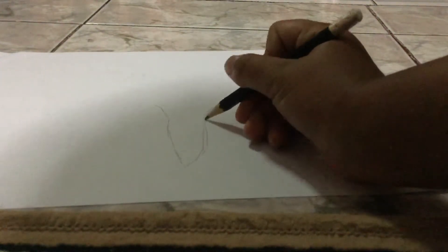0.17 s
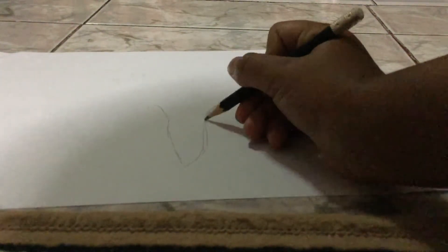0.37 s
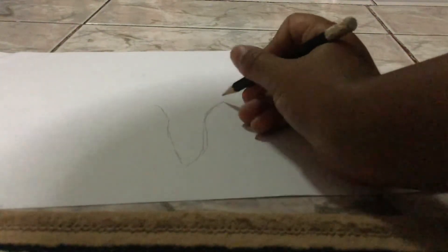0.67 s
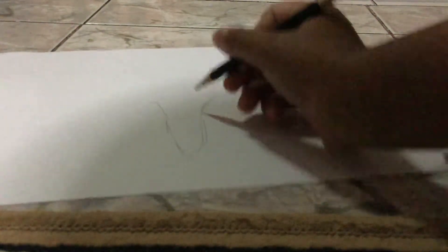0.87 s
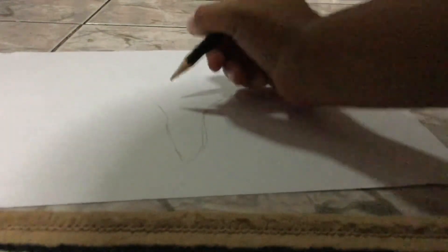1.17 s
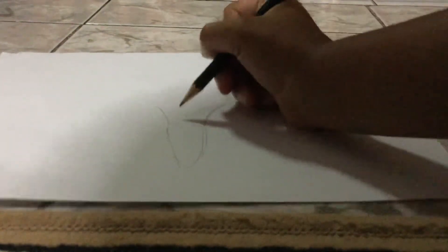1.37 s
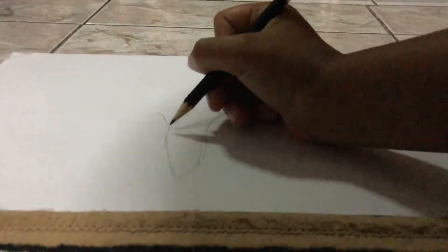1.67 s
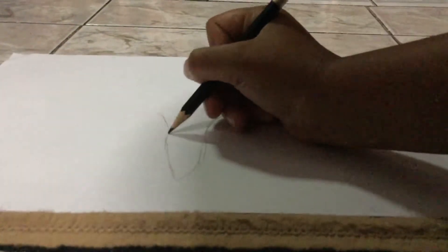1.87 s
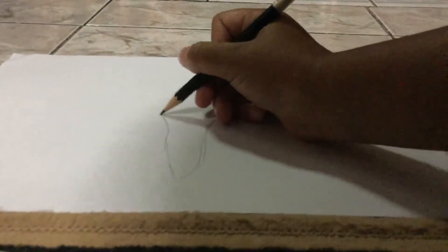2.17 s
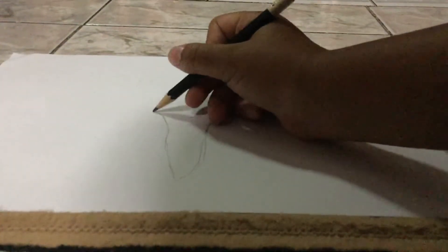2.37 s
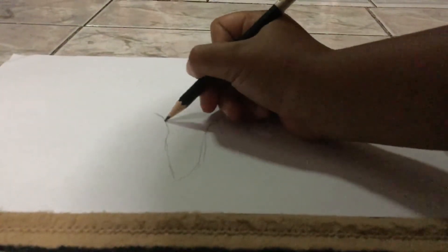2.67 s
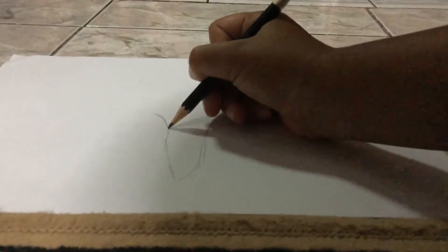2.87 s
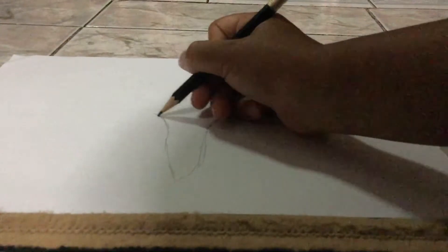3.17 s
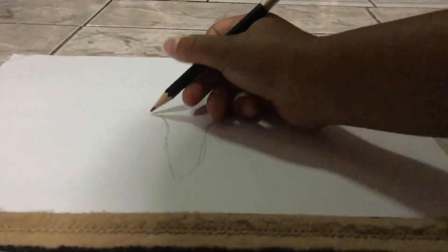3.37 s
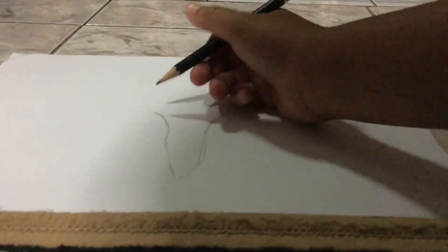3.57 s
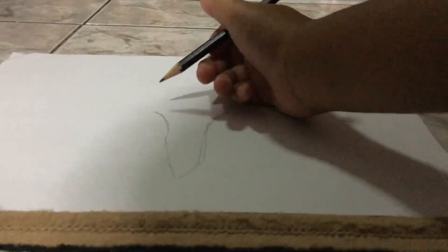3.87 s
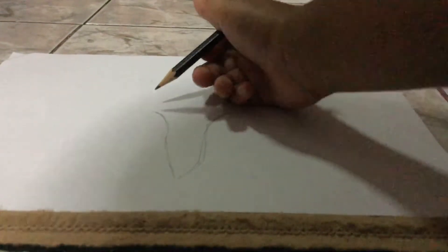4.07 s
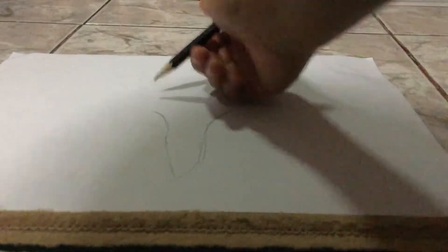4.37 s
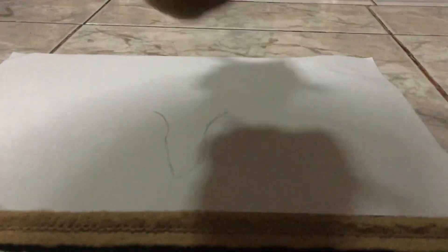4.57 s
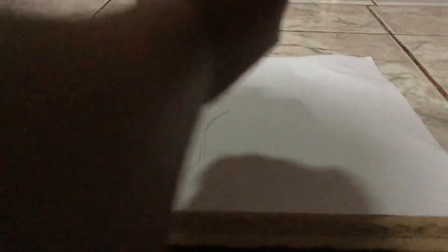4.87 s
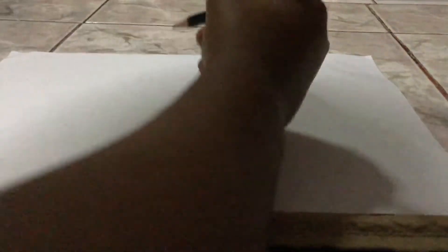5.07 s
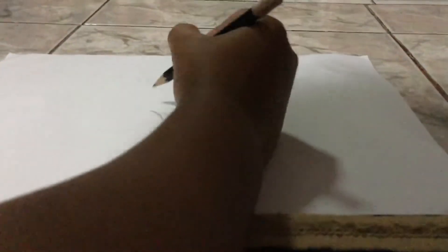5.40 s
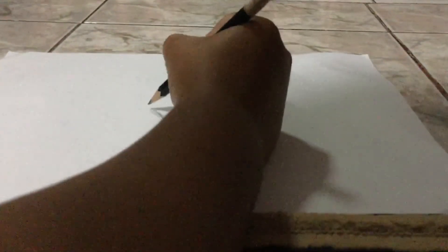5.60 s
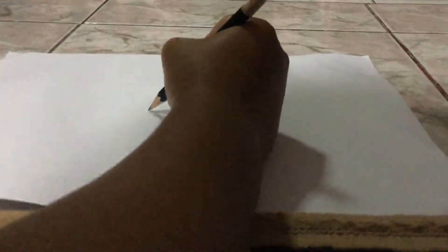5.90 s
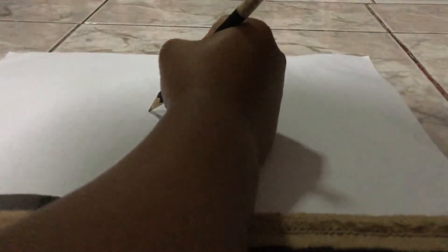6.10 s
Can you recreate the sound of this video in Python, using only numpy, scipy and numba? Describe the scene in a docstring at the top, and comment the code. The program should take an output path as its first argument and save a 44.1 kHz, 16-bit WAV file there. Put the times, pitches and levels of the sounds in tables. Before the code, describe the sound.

Close to a phone microphone in a quiet room, a fan hums low while a pencil makes light, hissy strokes on paper, with an occasional tick of the tip. After the sketching, a hand gives a few dull, soft bumps on the pad. Two loud scuffs follow as an arm drags against the phone, the first the strongest, trailing off into faint rubbing on the paper.

```python
"""A pencil sketches short, light strokes on paper on the floor, close to a phone, over a low fan hum.
Graphite plucks the fibres, ringing the sheet, the tip and the hollow of the hand; now and then it clicks.
The hand bumps the pad with soft thuds. The arm reaches past and scuffs the phone twice, loudly, ringing
its case, then settles on the paper with a few softer rubs.
The hum dips briefly around the loud scuffs, with one small swell between."""
import sys
import numpy as np
from scipy import signal
from scipy.fft import rfft, irfft
from scipy.io import wavfile
from numba import njit

SR = 44100
rng = np.random.default_rng(int(sys.argv[2]) if len(sys.argv) > 2 else 0)


def store_wav(level_fs):
    """Save 16-bit WAV to argv[1]."""
    pcm = np.round(np.clip(np.atleast_2d(level_fs), -1, 1) * 32767)
    wavfile.write(sys.argv[1], SR, pcm.T.astype(np.int16))


N = 275183
TIME = np.arange(N) / SR


def undb(db):
    """Decibels to gain."""
    return 10 ** (np.asarray(db) / 20)


def unit(x):
    """Scale to rms 1."""
    return x / np.sqrt(np.mean(x ** 2))


def curves(table):
    """Automation lanes: each column after the first, interpolated over time."""
    times, *columns = np.transpose(table)
    return [np.interp(TIME, times, column) for column in columns]


def colour(x, points):
    """EQ a sound through (frequency [Hz], gain [dB]) points, rolling off beyond the ends; rms 1."""
    hz, db = np.transpose(points)
    log_hz = np.log(np.maximum(np.fft.rfftfreq(N, 1 / SR), 1))
    knots = np.log(np.r_[hz[0] / 2, hz, hz[-1] * 2])
    eq_db = np.interp(log_hz, knots, np.r_[db[0] - 20, db, db[-1] - 20])
    return unit(irfft(rfft(x) * undb(eq_db), N))


def resonate(x, hz, width_hz):
    """One resonance, gain 1 at its centre."""
    return signal.lfilter(*signal.iirpeak(hz, hz / width_hz, fs=SR), x)


@njit
def glide(x, hz, width_hz):
    """A resonance whose centre moves, gain 1 at the centre."""
    y, band, low = np.empty(len(x)), 0., 0.
    for i in range(len(x)):
        g = np.tan(np.pi * hz[i] / SR)
        damping = np.pi * width_hz / SR * (g + 1 / g)
        v = (band + g * (x[i] - low)) / (1 + g * (g + damping))
        band, low, y[i] = 2 * v - band, low + 2 * g * v, damping * v
    return y


def walk(rate):
    """Smooth random modulation, rms 1, changing about rate times a second."""
    hz = np.fft.rfftfreq(N, 1 / SR)
    return unit(irfft(rfft(rng.standard_normal(N)) / (1 + (2 * hz / rate) ** 4), N))


def sweep(start, length, fastest, rise, fall):
    """Envelope of one hand move: speed to the power rise while speeding up, fall while slowing."""
    along = np.interp(TIME, start + length * np.array([0, np.clip(fastest, .05, .95), 1]), [0, .5, 1])
    speed = np.sin(np.pi * along) * (along < 1)
    return speed ** np.where(along < .5, rise, fall)


def friction(snag_rate, spread_db, judder_db, judder_rate):
    """Tiny snags of uneven size, bunched by the stick and slip of the contact; rates are per second."""
    snags = (rng.random(N) < snag_rate / SR) * rng.choice([-1, 1], N)
    size_db = spread_db * np.clip(rng.standard_normal(N), -2, 2) + judder_db * walk(judder_rate)
    return snags * undb(size_db)


def reflections(x, wet_db, decay_ms, lowest_hz=1400):
    """Small things nearby scatter the treble back as a quick, dense cluster of echoes."""
    age_ms = np.arange(SR // 16) * 1000 / SR
    tail = rng.standard_normal(len(age_ms)) * np.exp(-age_ms / decay_ms) * (age_ms > 2)
    tail = signal.sosfilt(signal.butter(2, lowest_hz, "high", fs=SR, output="sos"), tail)
    return x + undb(wet_db) * signal.fftconvolve(x, tail / np.linalg.norm(tail))[:N]


def pencil_strokes():
    """Graphite plucks paper fibres; sheet and tip ring, and the cupped hand colours the scratch."""
    # stroke cues: (start [s], length [s], fastest at [share of length], level [dB], tip share [0-1])
    strokes = [(-0.12, 0.3, 0.76, -61.5, 1), (0.134, .16, 0.61, -73.5, 0.8),
               (0.35, 0.27, 0.89, -60.5, 0.97), (0.813, 0.14, 0.53, -62.5, .8),
               (1.061, 0.085, 0.57, -78.5, 0.4), (1.23, 0.034, .5, -73.5, 0.4),
               (1.263, 0.13, 0.29, -75.5, .2), (1.351, 0.36, 0.38, -63, 0.01),
               (1.893, 0.31, 0.48, -70, 0.27), (2.111, 0.19, 0.62, -73.5, 0.08),
               (2.5, 0.41, 0.37, -72.5, 0), (2.86, .055, .5, -77, 0.12), (2.98, .12, 0.53, -65, 0.02),
               (3.082, 0.12, .5, -65, 0), (3.195, 0.095, 0.45, -71, 0)]
    # the hand cupped over the point: (time [s], share coloured by the hand [0-1], hollow tuning [ratio])
    grip = [(0, .9, 1.4), (.87, 0.84, 1.2), (1.42, 0.4, 0.89), (1.65, .25, 0.5), (1.95, 1, 0.93),
            (2.25, 0.94, 0.99), (2.6, 0.7, 0.995), (2.8, 0.75, 0.95), (3.25, 0.46, 0.98)]
    # resonances between hand and sheet: (centre [Hz], width [Hz], gain [dB])
    hollow_modes = [(4430, 220, -5), (5820, 420, 2), (6800, 460, 3.5), (9400, 650, 3), (10900, 360, 2.5),
                    (11870, 330, 2.5), (12600, 440, -8)]
    # tone of graphite on paper, and of the ringing tip: (frequency [Hz], gain [dB])
    sheet_eq = [(750, 4), (1500, -8), (2800, -11.5), (3900, 1.5), (5300, 5), (7000, -1.5), (9000, 0.5),
                (11600, -0.5), (13200, -7.5), (15500, -15)]
    tip_eq = [(1500, -13), (3000, -23), (3900, -13), (5400, -15), (7400, -5.5), (8600, -0.5), (9500, -1),
              (10400, -8), (12700, -7.5), (14000, -22), (15500, -23)]
    tip_power = sheet_power = 0
    for start, length, fastest, db, tip_share in strokes:
        power = (undb(db) * sweep(start, length, fastest, rise=0.82, fall=1)) ** 2
        tip_power += tip_share * power
        sheet_power += (1 - tip_share) * power
    cupped, tuning = curves(grip)
    tuning = np.clip(tuning, .8, 1.2)
    fibres = friction(snag_rate=12000, spread_db=1.5, judder_db=0.9, judder_rate=220)
    grit = friction(snag_rate=10000, spread_db=-0.5, judder_db=2.0, judder_rate=110)
    hollow = sum(undb(db) * glide(grit, hz * tuning, float(width)) for hz, width, db in hollow_modes)
    sheet = np.sqrt(1 - cupped) * colour(fibres, sheet_eq) + np.sqrt(cupped) * unit(hollow)
    return np.sqrt(sheet_power) * sheet + np.sqrt(tip_power) * colour(fibres, tip_eq)


def room_tone(hum_db=-61, air_db=-73, waver_db=1.3, drift_hz=1.6, tone_waver_db=3, fade_s=.05):
    """A fan's uneven rumble and wavering tones, with a few brief dips, over a faint steady hiss."""
    # tone of the fan's rumble, and of the room's hiss: (frequency [Hz], gain [dB])
    hum_eq = [(22, -33), (34, -9), (45, -5), (75, 2.5), (125, 0), (190, 4), (260, 0), (330, -7), (400, -12),
              (480, -24), (800, -52.5)]
    air_eq = [(200, 4), (500, -0.5), (750, 0), (920, -4), (1170, 0), (1600, -5), (2200, -9), (3300, -11.5),
              (5200, -12.5), (6500, -14.5), (8500, -16.5), (12500, -19.5), (15500, -27.5)]
    # tones in the fan's hum: (pitch [Hz], level [dB])
    fan_tones = [(99, -78.5), (192, -70), (233, -76), (530, -93)]
    # the hum dips around the loud scuffs, with one small swell between: (start [s], length [s], gain [dB])
    hum_rides = [(4.786, .18, -7), (5.003, 0.15, 2.5), (5.1, 0.604, -8), (6, 0.063, -3.5)]
    ride_db = sum(db * np.clip(.5 + np.minimum(TIME - start, start + length - TIME) / fade_s, 0, 1)
                  for start, length, db in hum_rides)
    hum = colour(rng.standard_normal(N), hum_eq) * undb(hum_db + waver_db * walk(25))
    for hz, db in fan_tones:
        phase = 2 * np.pi * np.cumsum(hz + drift_hz * walk(8.5)) / SR
        hum += unit(np.sin(phase) * undb(tone_waver_db * walk(18))) * undb(db)
    air = colour(reflections(rng.standard_normal(N), wet_db=-10, decay_ms=13), air_eq)
    return hum * undb(ride_db) + air * undb(air_db)


def pencil_ticks():
    """The point catches: a tiny noise burst rings as a sharp click."""
    # click cues: (time [s], peak [dB], centre [Hz], width [Hz], decay [ms])
    ticks = [(0.912, -36.5, 7000, 4200, 1), (3.24, -62, 7500, 1240, 2.5), (3.598, -57, 10500, 4500, 0.51),
             (4.179, -65.5, 4200, 665, 6.6)]
    out = np.zeros(N)
    for start, db, hz, width_hz, decay_ms in ticks:
        age_ms = (TIME - start) * 1000
        burst = rng.standard_normal(N) * (age_ms >= 0) * np.exp(-np.clip(age_ms / decay_ms, 0, 40))
        click = resonate(resonate(burst, hz, width_hz), hz, width_hz)
        out += undb(db) * click / np.abs(click).max()
    return out


def arm_rubs(hard_db=-37):
    """Skin and cloth drag past: coarse snags rasp, fine ones hiss; hard scuffs ring the phone's case."""
    # rubs on paper and phone: (start [s], length [s], fastest at [share of length], rasp [dB], hiss [dB])
    rubs = [(1.39, 0.56, 0.53, -76, -95), (3.048, 0.55, 0.97, -75.5, -103), (4.664, 0.3, 0.33, -65, -78),
            (4.714, 0.12, 0.28, -27, -28.5), (5.104, 0.13, 0.67, -38.5, -45),
            (5.185, 0.15, 0.23, -47.5, -52.5), (5.288, .07, 0.3, -58, -71), (5.353, 0.11, .45, -64, -66),
            (5.419, 0.07, 0.61, -54, -63.5), (5.467, 0.11, 0.31, -65.5, -76),
            (5.552, 0.044, 0.54, -61, -67), (5.6, 0.37, 0.16, -72.5, -95), (5.882, 0.12, 0.46, -72.5, -72),
            (5.926, 0.55, 0.31, -73, -100), (6.013, 0.049, 0.37, -77.5, -74.5),
            (6.077, 0.075, 0.23, -54.5, -74), (6.129, 0.074, 0.46, -58, -73)]
    # resonances of the phone's case: (centre [Hz], width [Hz], gain [dB])
    case_modes = [(1410, 59, -21.5), (1760, 350, 0), (2300, 280, -3), (2400, 87, 8), (2680, 14, -10.5),
                  (3090, 170, 3.5), (3690, 210, 8)]
    # tone of a light rub, a hard scuff and the hiss of both: (frequency [Hz], gain [dB])
    rasp_eq = [(250, -25.5), (430, -15), (570, -8), (780, -3), (1050, 4), (1280, 3), (1650, -1.5),
               (2250, -3.5), (2800, -8.5), (3600, -5), (4600, -14.5), (6500, -19.5)]
    scuff_eq = [(350, -41.5), (480, -18.5), (650, -5.5), (820, -3.5), (1100, -0.5), (2000, -0.5),
                (3200, -5.5), (4400, -13), (6500, -14)]
    hiss_eq = [(1200, -9.5), (3000, -2.5), (5000, -3), (7000, -2), (9000, -2), (10500, -4.5), (12800, -3.5),
               (14500, -9), (15700, -10.5)]
    rasp_gain = hiss_gain = 0
    for start, length, fastest, rasp_db, hiss_db in rubs:
        # the rasp dies first as the arm slows
        rasp_gain = np.hypot(rasp_gain, undb(rasp_db) * sweep(start, length, fastest, 0.81, fall=1.9))
        hiss_gain = np.hypot(hiss_gain, undb(hiss_db) * sweep(start, length, fastest, 0.81, fall=0.59))
    coarse = friction(snag_rate=6000, spread_db=1, judder_db=1.12, judder_rate=280)
    fine = friction(snag_rate=20000, spread_db=2.5, judder_db=0.5, judder_rate=400)
    case = coarse + sum(undb(db) * resonate(coarse, hz, width) for hz, width, db in case_modes)
    pressed = rasp_gain ** 4 / (rasp_gain ** 4 + undb(hard_db) ** 4)  # crossfade from rub to scuff
    body = pressed * colour(case, scuff_eq) + (1 - pressed) * colour(coarse, rasp_eq)
    return body * rasp_gain + colour(fine, hiss_eq) * hiss_gain


def pad_bumps(rise_ms=4):
    """The soft heel of the hand presses the pad: a few low, damped swings."""
    # thud cues: (time [s], peak [dB], pitch [Hz], decay [ms])
    bumps = [(3.605, -50.5, 81, 14), (3.727, -54, 77, 33), (4.185, -36.5, 93, 2.9), (4.373, -59, 81, 29),
             (4.743, -43.5, 90.7, 6.4), (5.034, -48.5, 78.8, 8.9)]
    out = np.zeros(N)
    for start, db, hz, decay_ms in bumps:
        age = np.maximum(TIME - start, 0)
        age_ms = age * 1000
        envelope = (1 - np.exp(-age_ms / rise_ms)) * np.exp(-age_ms / decay_ms)
        thud = -np.sin(2 * np.pi * hz * age) * envelope
        out += undb(db) * thud / np.abs(thud).max()
    return out


def scene():
    """Mono mix: strokes and rubs with close reflections, dry clicks and thuds, and the room tone."""
    scrapes = reflections(pencil_strokes() + arm_rubs(), wet_db=-15.5, decay_ms=6.2)
    return (scrapes + pencil_ticks() + pad_bumps() + room_tone())[None]


def record(dry, port_hz=8550, port_width_hz=1300, port_db=-1, low_hz=42, top_hz=15800):
    """The microphone's port rings in the treble; the deepest bass and the top are cut."""
    ported = dry + undb(port_db) * resonate(dry, port_hz, port_width_hz)
    thinned = signal.sosfilt(signal.butter(2, low_hz, "high", fs=SR, output="sos"), ported)
    return signal.sosfilt(signal.ellip(10, .2, 70, top_hz, fs=SR, output="sos"), thinned)


dry = scene()
out = record(dry)
store_wav(out)
```